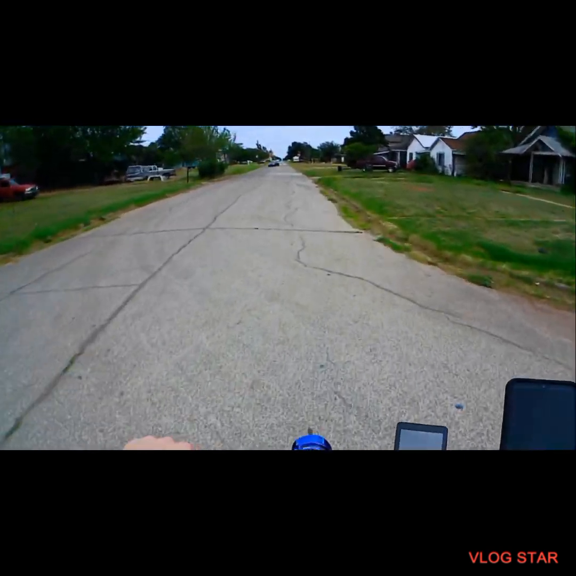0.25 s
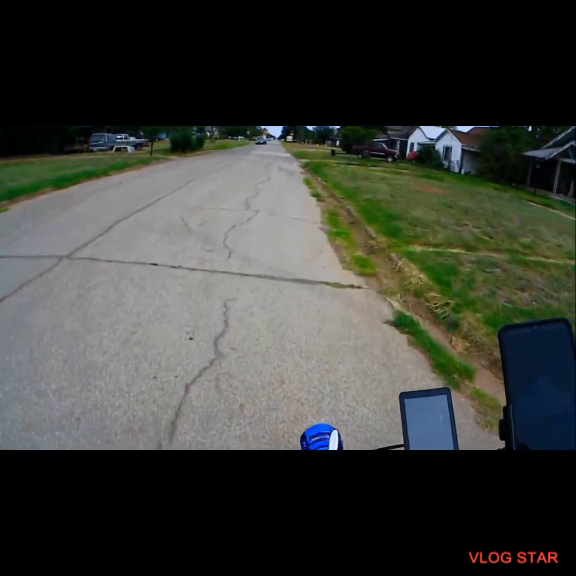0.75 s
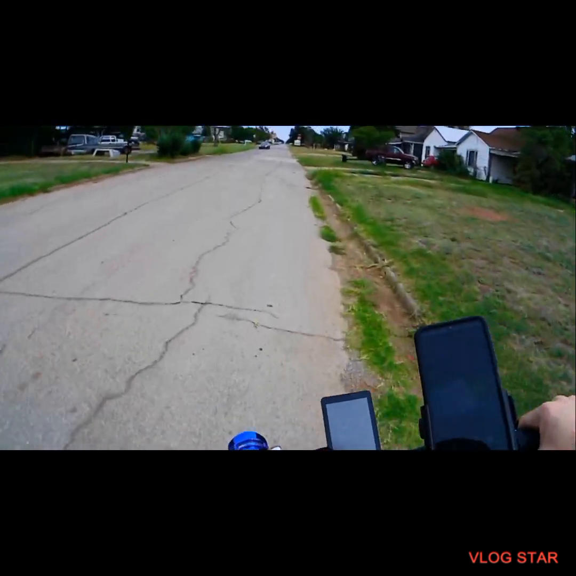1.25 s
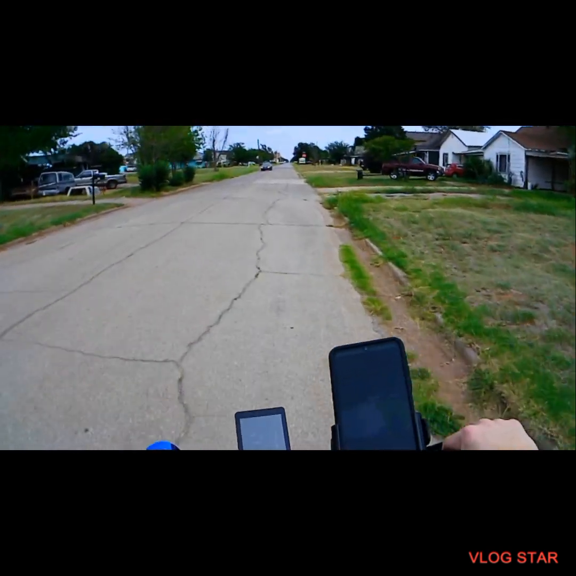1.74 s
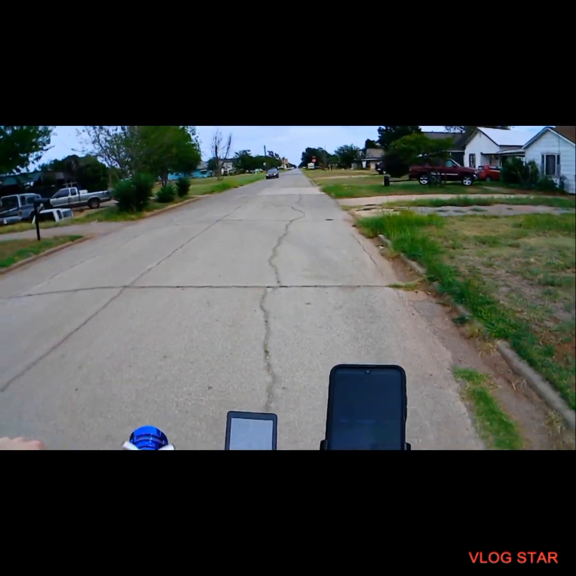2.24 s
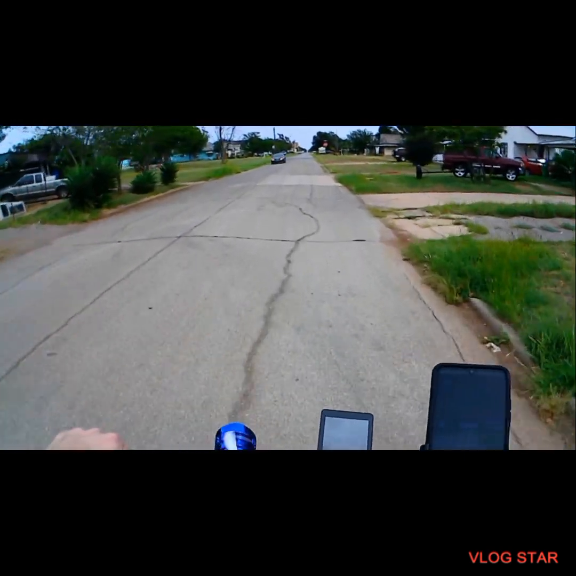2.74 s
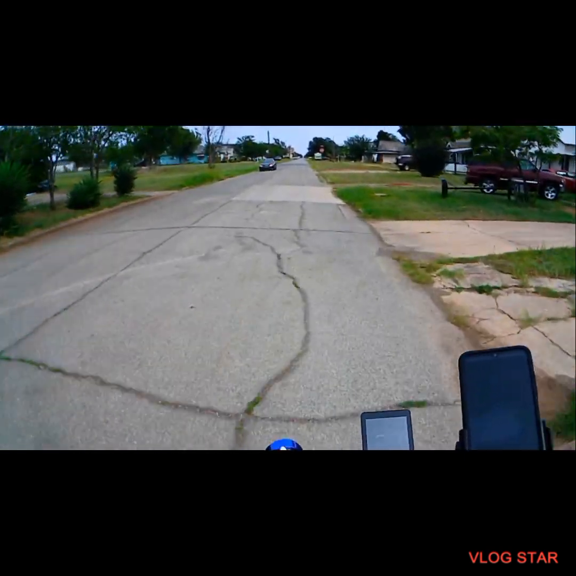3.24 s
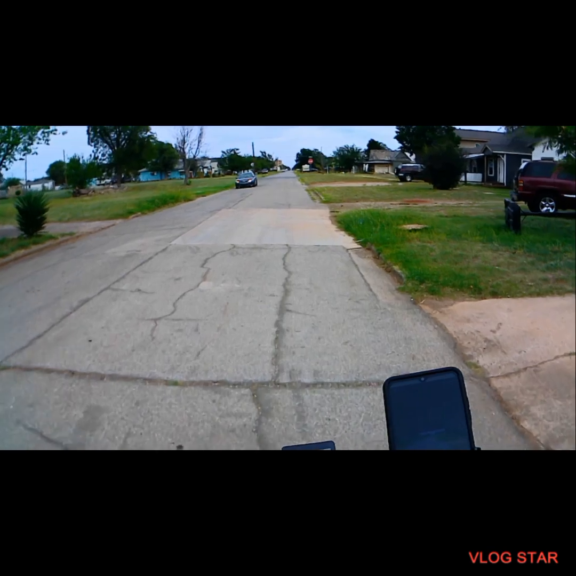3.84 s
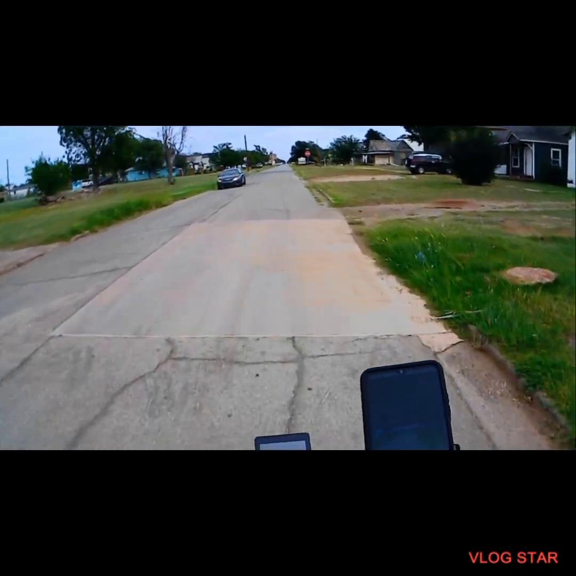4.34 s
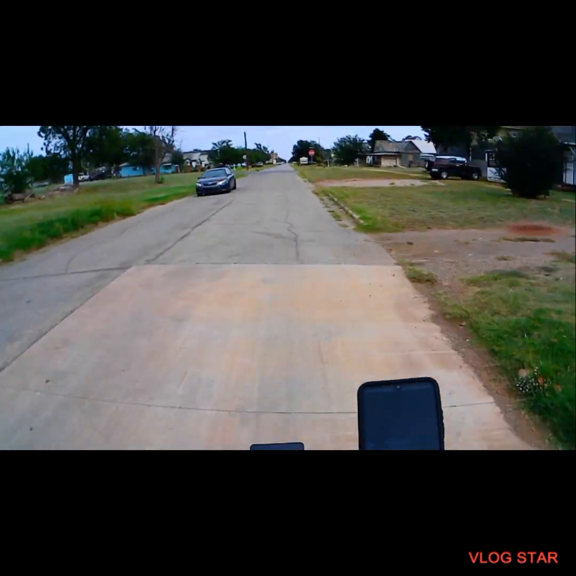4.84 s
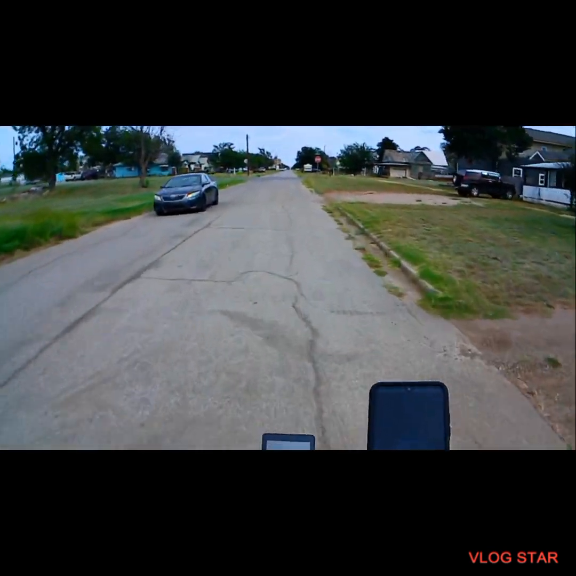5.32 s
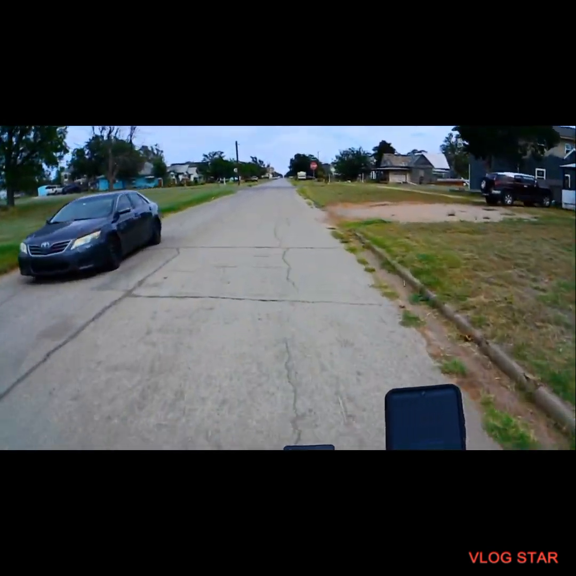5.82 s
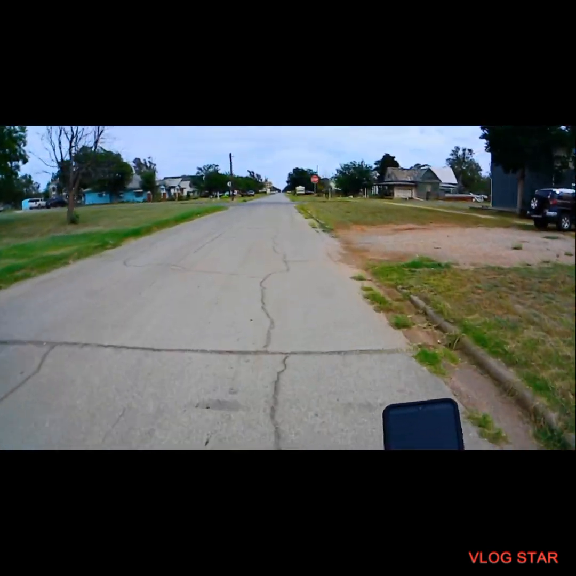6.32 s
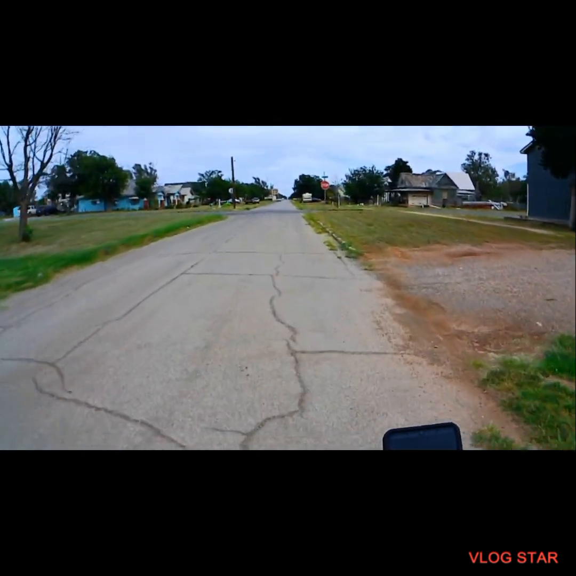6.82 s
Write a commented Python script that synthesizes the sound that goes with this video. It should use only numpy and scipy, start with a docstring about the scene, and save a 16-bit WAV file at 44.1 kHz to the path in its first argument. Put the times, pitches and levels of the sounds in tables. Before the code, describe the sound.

Close rider's-microphone sound of a slowly rising electric motor hum under gusty wind and gritty tyre noise, bumping over joints and swelling at the end.

```python
"""Electric scooter on cracked concrete

An electric scooter rides down a street, heard from a cased camera on the rider. The hub motor's tones
follow a wheel speed that climbs unevenly; wind is noise in a low thump, a buffet and a sputtering rush.
Tyres roar on grit as noise and dense impacts, and joints thud as decaying tones led by noise slaps.
Stones tick as filtered contacts, narrow-band noise sizzles in spells, and a small bird's raspy sines chirp."""
import sys
import numpy as np
from scipy.fft import rfft, irfft, next_fast_len
from scipy.io import wavfile
from scipy.ndimage import map_coordinates

SR = 44100
rng = np.random.default_rng(int(sys.argv[2]) if len(sys.argv) > 2 else 0)


def unload_wav(signal):
    """Save mono or channel-first audio to the path in sys.argv[1] as 16-bit WAV at rate SR, clipped to [-1, 1]."""
    wavfile.write(
        sys.argv[1],
        SR,
        np.round(np.clip(np.atleast_2d(signal).T, -1, 1) * 32767).astype(np.int16),
    )


N = 311787  # length in samples

# Wheel speed as the motor's main tone. Each row: time in seconds, pitch in Hz before a slight drift.
MOTOR_PITCH = [(0, 332), (.4, 337.4), (.8, 337.3), (1.3, 352), (1.72, 361.5), (2, 347), (2.42, 369),
               (2.9, 375.8), (3.6, 370), (3.95, 369.7), (4.25, 375.4), (4.5, 364.5), (4.88, 377.5),
               (6.05, 381.2), (6.4, 386.2), (6.68, 387), (7.07, 399.8)]
# The motor's hum before throttle and flutter. Each row: time in seconds, level in dB.
HUM_LEVEL = [(0, -45), (.25, -34), (.8, -34), (1.25, -29.5), (1.5, -39), (1.75, -35), (2, -32.5),
             (2.25, -39), (2.45, -37.5), (2.7, -39), (3.4, -36), (3.9, -28), (4.15, -32.5), (4.35, -38.5),
             (4.5, -30.5), (4.7, -36), (4.95, -30), (5.5, -35.5), (6.2, -30), (6.6, -33.5)]
# A weaker motor tone just under the main one, before flutter. Each row: time in seconds, level in dB.
UNDERTONE_LEVEL = [(0, -50), (1.1, -44.5), (1.7, -40), (1.95, -47), (2.3, -41), (3.6, -37.5), (4.5, -39.5),
                   (5.7, -36.5), (6.3, -38), (7, -42)]
UNDERTONE_ORDER = 0.9  # multiple of the main tone
# The motor's high tones. Each row: multiple of the main tone, relative level in dB.
WHINE_ORDERS = [(2.5, -9), (3, -5.5), (4, -12), (4.5, -4.5), (5, -8)]
WHINE_DB, WHINE_JITTER_RAD = -51.5, 0.36  # shared level while cruising; phase unrest
# The throttle opens near the end: the hum swells and the whine comes out.
THROTTLE_S, THROTTLE_RISE_S = 6.62, 0.13
THROTTLE_HUM_DB, THROTTLE_WHINE_DB = 6.5, 8
# The hub cover rings and lifts any high tone that passes through its resonance.
COVER_HZ, COVER_WIDTH_HZ, COVER_DB = 1720, 83, 5
CASE_HZ = 1880  # the camera case muffles the whine and the slaps above this

# Buffeting of the steady headwind between gusts. Each row: time in seconds, relative level in dB.
HEADWIND_LEVEL = [(0, -33.5), (.35, -34), (.85, -31), (1.4, -32), (1.75, -35.5), (2.2, -33.5), (2.78, -34),
                  (3.2, -29.5), (4.5, -27.5), (5.2, -29.5), (5.5, -27), (6.65, -27), (6.97, -31)]
# Gusts. Each row: start in seconds, length in seconds, buffet rise in dB, rush rise in dB.
GUSTS = [(.07, 0.053, 5.5, 9), (.16, .09, 4, 5), (.475, 0.058, 4.5, 5), (.575, 0.073, 4, 3),
         (.62, 0.032, -1, 4), (.84, .42, 2.5, 0), (.912, 0.347, 2.5, 7.5), (.975, 0.16, 1, 4),
         (1.45, 0.25, -0.5, 3.5), (2.06, 0.15, 2, 5.5), (2.48, .18, 3, 1.5), (2.85, .17, 3, 3.5),
         (2.93, .085, 3.5, 5), (3.11, 0.06, 3, 4.5), (3.42, 0.036, 2.5, 1), (3.63, 0.03, 2.5, 5),
         (3.735, 0.22, 2.5, 7), (3.895, 0.05, 2.5, 0), (3.99, .035, 0, 3), (4.115, 0.065, 1.5, 5),
         (4.3, 0.1, -0.5, 4), (4.75, .085, 2, 3.5), (5.29, .12, 0.5, 4), (5.715, .05, 3.5, 2.5),
         (5.97, 0.12, 1, 4), (6.06, .035, 3, 1.5), (6.27, .3, 2, 5), (6.36, .09, 0.5, 2.5),
         (6.6, 0.089, 2.5, 3.5), (6.73, 0.05, 3, 3), (7.01, .1, 5, 5.5)]
GUST_ATTACK_S, GUST_RELEASE_S = 0.025, 0.05
RUSH_DB, RUSH_GROWTH = -35.5, 1  # rush in an average headwind; its dB per dB of headwind
# Tone colours of the wind on the case. Each row: frequency in Hz, relative density in dB per Hz.
THUMP_SPECTRUM = [(20, -30), (45, -17.5), (70, -7), (105, 0), (145, 2), (200, -3), (300, -22.5),
                  (600, -72.5)]
BUFFET_SPECTRUM = [(60, -34), (110, -17.5), (160, -2.5), (250, -0.5), (350, -2.5), (450, -4.5), (560, -14),
                   (900, -27), (2000, -84.5)]
RUSH_SPECTRUM = [(150, -25.5), (300, -1), (450, 1), (600, 1), (850, -2), (1100, -6), (1400, -11.5),
                 (2000, -21.5), (3000, -43.5), (6000, -65.5), (10000, -88.5)]

# Coarseness of the concrete, setting the tyre roar. Each row: time in seconds, relative level in dB.
SURFACE_COARSENESS = [(0, -40.5), (1.4, -39), (2, -41), (2.75, -40.5), (3.5, -38.5), (4.1, -37.5),
                      (5.7, -36.5), (6.45, -38), (6.85, -42)]
# Gritty patches under the tyres. Each row: start in seconds, length in seconds, grit rise in dB.
PATCHES = [(.1, 0.072, 1), (.925, 0.2, 5.6), (2.08, .1, 3), (2.92, 0.29, 2), (3.6, 0.054, 3.5),
           (3.77, 0.28, 2), (4.08, 0.065, 3.5), (4.28, .1, 0), (4.5, 0.07, 2), (4.74, 0.09, 2.5),
           (4.92, .12, 1.5), (5.21, 0.15, 3.5), (5.68, 0.073, 5), (6.03, 0.084, 3), (6.29, .16, 2.5),
           (6.66, 0.63, 5.5)]
PATCH_ATTACK_S, PATCH_RELEASE_S = 0.045, 0.087
# Grit on average concrete; its dB per dB of coarseness; its dB per dB of a gust's rush rise.
GRIT_DB, GRIT_GROWTH, GRIT_PER_GUST = -53.5, 1.98, 0.12
# Tone colours of the tread. Each row: frequency in Hz, relative density in dB per Hz.
ROAR_SPECTRUM = [(400, -22), (800, -1), (1120, 4.5), (1240, -0.5), (1550, 1.5), (1760, 0.5), (1950, -8),
                 (2250, -21), (3000, -34.5), (5000, -68.5)]
GRIT_SPECTRUM = [(1200, -17), (2000, 4.5), (2550, 3), (3200, -5.5), (4100, -8), (4700, -13.5),
                 (5400, -22.5), (7000, -27.5), (10000, -44), (11200, -60.5)]
# Spells of thin sizzle. Each row: start in seconds, length in seconds, rise in dB.
SIZZLES = [(3.75, 1.1, 3), (4.13, 0.16, 7.5), (4.35, .5, 6.5), (6.24, 0.1, 11.5)]
SIZZLE_DB, SIZZLE_ATTACK_S, SIZZLE_RELEASE_S = -87, 0.04, 0.06

# Tone colour of the microphone hiss. Each row: frequency in Hz, relative density in dB per Hz.
HISS_SPECTRUM = [(2000, -10), (4000, 0), (7000, 3), (10300, -3), (11200, -24)]

# Tyres crossing joints. Each row: time in seconds, relative thud level in dB, relative slap level in dB.
JOINTS = [(.497, -22, -21), (.914, -28, -30), (1.037, -28, -25), (1.123, -19, -20.5), (1.243, -18.5, -18),
          (2.938, -26.5, -23), (2.993, -24, -28), (3.655, -17.5, -26), (3.918, -20, -27), (4.059, -28, -23),
          (4.166, -23, -22), (5.741, -18, -20), (5.982, -22, -21), (6.081, -16.5, -16.5), (6.388, -24, -27),
          (6.67, -25, -20.5), (6.785, -19, -27)]
# What the chassis rings with at a joint. Each row: pitch in Hz, relative level in dB, 60 dB decay in seconds.
CHASSIS_MODES = [(148, -4.5, .07), (260, 0, .06), (420, 0, 0.027)]
SLAP_T60_S, SLAP_DB = 0.03, 12  # 60 dB decay of a tread slap; gain on all slaps

# Stones hitting the frame. Each row: time in seconds, tick peak in dB, centre in Hz, width in octaves,
# snap peak in dB.
STONES = [(.497, -38, 2400, .25, -66), (0.8367, -36, 3830, 0.23, -50), (1.377, -30.5, 2566, 0.21, -62.5),
          (2.2235, -43, 4000, 0.12, -68), (2.275, -53, 6460, .35, -61), (2.5882, -29.5, 3900, 0.33, -40),
          (2.9328, -51, 7400, 0.28, -61), (3.888, -52, 5470, 0.32, -57.5), (3.922, -52, 5180, .35, -58.5),
          (4.248, -28, 1850, 0.13, -63.5), (4.292, -53, 8570, 0.29, -60.5), (4.321, -18.5, 1760, 0.17, -65),
          (5.983, -40, 3000, .5, -62.5), (6.083, -33, 3000, 0.5, -59)]
SNAP_HZ, SNAP_OCTAVES = 6500, 0.42  # the bright edge of a stone's contact

# Bird chirps. Each row: start in seconds, relative level in dB, starting pitch in Hz, length in seconds,
# fall as a share of the pitch.
CHIRPS = [(1.003, -53, 4600, .022, .02), (1.128, -50, 4450, .026, .03), (1.25, -52.5, 4460, .036, 0.036),
          (1.355, -55, 3880, .02, .04), (1.385, -55.5, 4650, .038, .15), (1.485, -55, 3840, .032, .1),
          (3.93, -51.5, 4600, .035, .08), (4.002, -48.5, 4440, .045, .14), (4.577, -52, 5000, .047, .12),
          (4.701, -55, 4730, .03, .11), (4.898, -52, 4630, .04, 0.11)]

TOP_HZ = 11200  # the camera's band limit


def amp(db):
    """Decibels to gain."""
    return 10 ** (np.asarray(db) / 20)


def unit(x):
    """Scale to rms 1."""
    return x / np.sqrt(np.mean(x ** 2) + 1e-20)


def curves(rows):
    """One value per sample for each column after the time."""
    s, *cols = np.transpose(rows)
    return [np.interp(np.arange(N) / SR, s, c) for c in cols]


def wobble(rate):
    """A smooth random curve, rate knots a second."""
    knots = rng.standard_normal(int(N * rate / SR) + 4)
    return map_coordinates(knots, [np.arange(N) * rate / SR])


def swell(start_s, length_s, attack_s, release_s):
    """Rises from 0 towards 1 and holds at most to the end of its length, then falls away."""
    t = np.arange(N) / SR - start_s
    rise, fall = t / attack_s, 1 - (t - length_s) / release_s
    return np.clip(np.minimum(rise, fall), 0, 1)


def swells(rows, attack_s, release_s):
    """The summed swells of (start, length, rise, ..) rows: one curve per rise column."""
    return sum(np.outer(rises, swell(s, length, attack_s, release_s)) for s, length, *rises in rows)


def filtered(x, response):
    """x times a response of frequency."""
    size = next_fast_len(len(x) + 8192)
    return irfft(rfft(x, size) * response(np.fft.rfftfreq(size, 1 / SR)), size)[:len(x)]


def coloured(x, spectrum):
    """x shaped by (Hz, dB) points on a log axis, at rms 1."""
    f, db = np.transpose(spectrum)
    return unit(filtered(x, lambda hz: amp(np.interp(np.log(hz + 1), np.log(f), db))))


def band(x, centre_hz, octaves):
    """x through a bell-shaped band."""
    return filtered(x, lambda hz: np.exp(-.5 * (np.log2((hz + 1) / centre_hz) / octaves) ** 2))


def muffled(x):
    """x as heard through the camera case, a steep low-pass."""
    return filtered(x, lambda hz: 1 / (1 + (hz / CASE_HZ) ** 24))


def noise():
    """White noise for the whole ride."""
    return rng.standard_normal(N)


def grains(rate, spread_db):
    """Random impacts of uneven size, rate a second, at rms 1."""
    struck = rng.random(N) < rate / SR
    return unit(struck * noise() * amp(2 * spread_db * rng.random(N)))


def add(track, s, sound):
    """Mix a sound into the track at time s."""
    room = track[max(round(s * SR), 0):][:len(sound)]
    room += sound[:len(room)]


def flutter_tone(db, phase, flutter_db):
    """A sine at an rms level in dB that flutters at random."""
    return amp(db + flutter_db * wobble(16)) * np.sqrt(2) * np.sin(phase)


def cover_db(hz):
    """Lift from the hub cover's resonance."""
    return COVER_DB / (1 + ((hz - COVER_HZ) / COVER_WIDTH_HZ) ** 2)


def motor():
    """Magnetic ripple in the hub: a pure hum locked to the wheel, and a rougher whine that rings in the cover."""
    pitch, = curves(MOTOR_PITCH)
    hum_db, = curves(HUM_LEVEL)
    undertone_db, = curves(UNDERTONE_LEVEL)
    angle = 2 * np.pi * np.cumsum(pitch * (1 + 0.0012 * wobble(14))) / SR
    load = np.clip((np.arange(N) / SR - THROTTLE_S) / THROTTLE_RISE_S, 0, 1)

    hum = flutter_tone(hum_db + THROTTLE_HUM_DB * load, angle, flutter_db=0.5)
    undertone = flutter_tone(undertone_db, UNDERTONE_ORDER * angle, flutter_db=1.5)
    whine = np.zeros(N)
    for order, db in WHINE_ORDERS:
        rough_phase = order * angle + WHINE_JITTER_RAD * wobble(70)
        whine += flutter_tone(db + cover_db(order * pitch), rough_phase, flutter_db=0.9)
    return hum + undertone + amp(WHINE_DB + THROTTLE_WHINE_DB * load) * muffled(whine)


def wind(gust_thinning=0.29):
    """Slow eddies thump on the case; strong gusts tear them into a brighter, sputtering rush."""
    steady_db, = curves(HEADWIND_LEVEL)
    buffet_rise, rush_rise = swells(GUSTS, GUST_ATTACK_S, GUST_RELEASE_S)
    unrest = wobble(12)
    buffet_db = steady_db + buffet_rise + 0.5 * unrest
    headwind_lift = RUSH_GROWTH * (steady_db - steady_db.mean())
    rush_db = RUSH_DB + headwind_lift + rush_rise + 0.25 * unrest

    # the thump thins as the rush gains on the buffet
    thump_db = buffet_db - 8.0 - gust_thinning * (rush_db - buffet_db)
    thump = amp(thump_db) * coloured(noise(), THUMP_SPECTRUM)
    eddies = wobble(70)
    buffet = amp(buffet_db + 0.86 + 0.5 * eddies) * coloured(noise(), BUFFET_SPECTRUM)
    sputter = noise() * amp(0.91 * eddies + 2.24 * wobble(350))
    return thump + buffet + amp(rush_db) * coloured(sputter, RUSH_SPECTRUM)


def tyres():
    """The tread strikes rough concrete: a dense roar with crisp grit on top, brighter on patches and in gusts."""
    roar_db, = curves(SURFACE_COARSENESS)
    patch_db, = swells(PATCHES, PATCH_ATTACK_S, PATCH_RELEASE_S)
    _, gust_db = swells(GUSTS, GUST_ATTACK_S, GUST_RELEASE_S)
    coarse_lift = GRIT_GROWTH * (roar_db - roar_db.mean())
    grit_db = GRIT_DB + coarse_lift + patch_db + GRIT_PER_GUST * gust_db + 0.45 * wobble(11)

    texture = amp(1.1 * wobble(45) + 0.53 * wobble(14))
    roar_contact = texture * (noise() + 0.79 * grains(rate=900, spread_db=1))
    grit_contact = texture * (noise() + 0.65 * grains(rate=700, spread_db=5.5))
    roar = amp(roar_db + 2.0) * coloured(roar_contact, ROAR_SPECTRUM)
    return roar + amp(grit_db) * coloured(grit_contact, GRIT_SPECTRUM)


def sizzle():
    """A thin, narrow band of noise and sparse grains that swells in spells."""
    rise_db, = swells(SIZZLES, SIZZLE_ATTACK_S, SIZZLE_RELEASE_S)
    level_db = SIZZLE_DB + rise_db + 1.5 * wobble(25)
    source = noise() + 0.8 * grains(rate=250, spread_db=4.5)
    return amp(level_db) * unit(band(source, centre_hz=9300, octaves=0.13))


def microphone_hiss():
    """The microphone's faint, steady noise."""
    return amp(-77.0) * coloured(noise(), HISS_SPECTRUM)


def joints():
    """Each joint jolts the chassis into a short, dull ring, led by a brief slap of the tread."""
    thuds, slaps = np.zeros(N), np.zeros(N)
    t = np.arange(SR // 4) / SR
    ring = sum(amp(db - 60 * t / t60) * np.sin(2 * np.pi * hz * t) for hz, db, t60 in CHASSIS_MODES)
    onset = 1 - np.exp(-t / 0.0015)
    for s, thud_db, slap_db in JOINTS:
        add(thuds, s, amp(thud_db) * onset * ring)
        add(slaps, s, amp(slap_db - 60 * t / SLAP_T60_S))
    slap_noise = band(slaps * noise(), centre_hz=810, octaves=0.85)
    return thuds + amp(SLAP_DB) * muffled(slap_noise)


def stones():
    """Flung stones tick once, each in its own register: a sharp contact with a bright snap, and a brief rasp."""
    out = np.zeros(N)
    t = np.arange(-SR // 50, SR // 50) / SR  # room before the contact for the filters to ring
    for s, db, hz, octaves, snap_db in STONES:
        rasp = (t > 0) * rng.standard_normal(len(t)) * amp(-60 * np.abs(t) / 0.0084)
        contact = (t == 0) + 0.11 * rasp
        tick = band(contact, hz, octaves)
        snap = band(contact, SNAP_HZ, SNAP_OCTAVES)
        add(out, s + t[0], amp(db) * tick / np.abs(tick).max() + amp(snap_db) * snap / np.abs(snap).max())
    return out


def bird(rasp=0.2):
    """Short chirps, raspy from random pitch jitter, that start level, then droop and fade."""
    out = np.zeros(N)
    for s, db, hz, length, fall in CHIRPS:
        u = np.linspace(0, 1, int(length * SR))  # progress through the chirp
        pitch = hz * (1 - fall * u ** 2 + rasp * rng.standard_normal(len(u)))
        envelope = np.sin(np.pi * u ** 0.82)
        add(out, s, amp(db - 4.0) * envelope * np.sin(2 * np.pi * np.cumsum(pitch) / SR))
    return out


def scene():
    """Everything reaches one microphone, over its faint hiss."""
    ride = motor() + wind() + tyres() + sizzle() + microphone_hiss()
    return (ride + joints() + stones() + bird())[None]


def record(dry):
    """The camera keeps nothing above its band limit."""
    return filtered(dry[0], lambda hz: hz < TOP_HZ)[None]


dry = scene()
out = record(dry)
unload_wav(out)
```